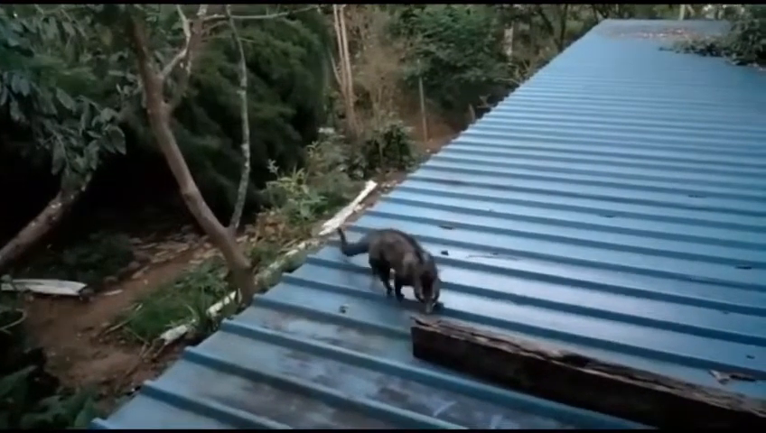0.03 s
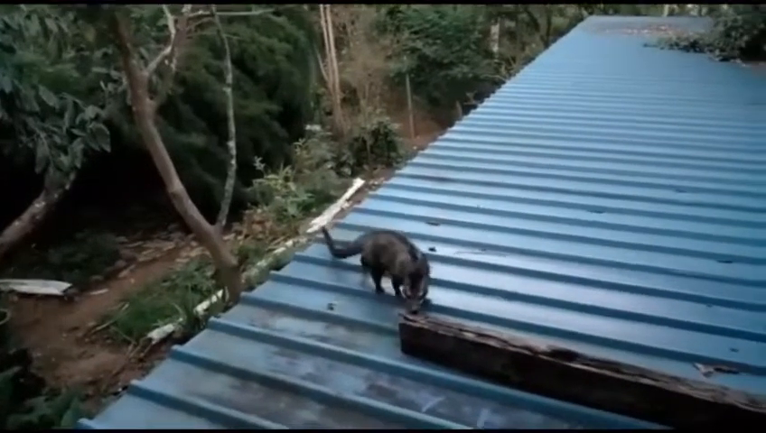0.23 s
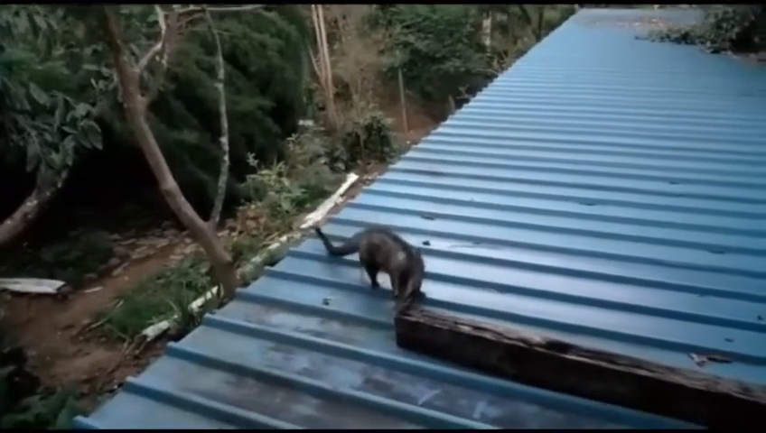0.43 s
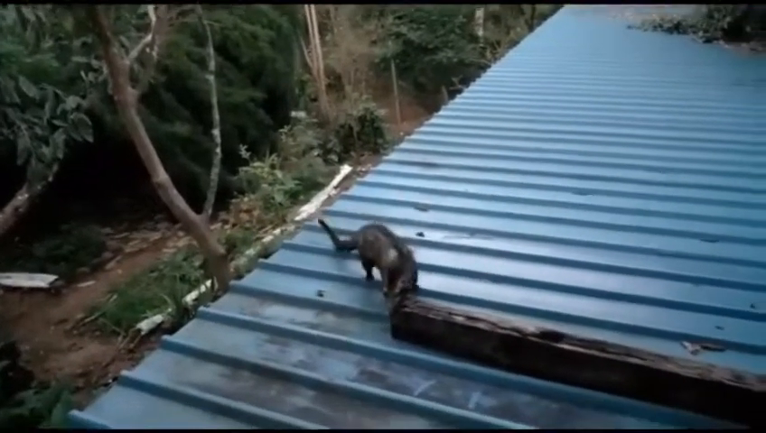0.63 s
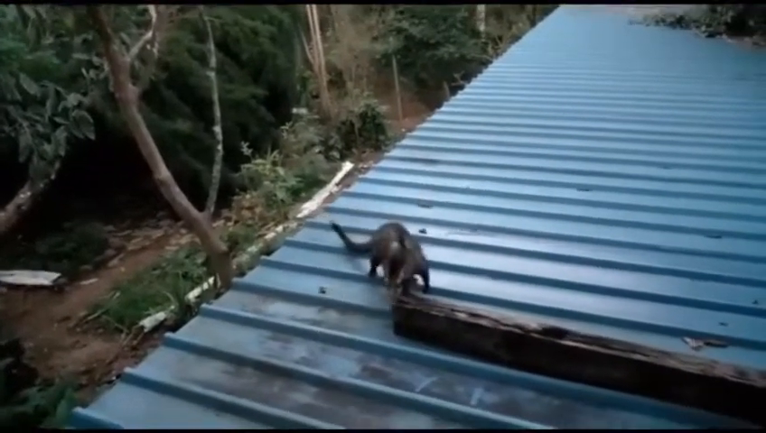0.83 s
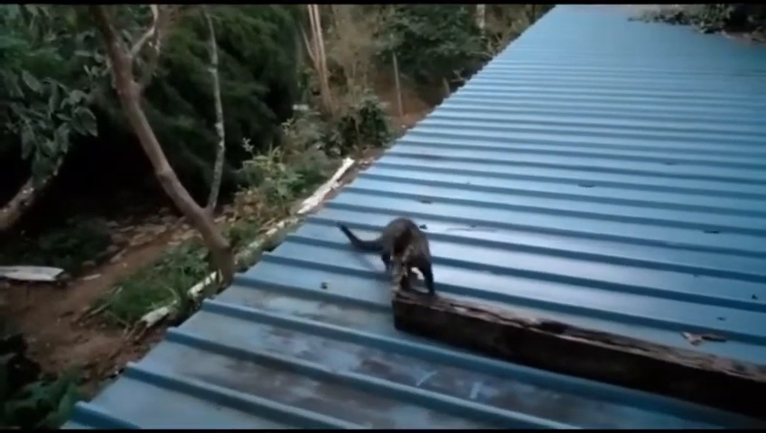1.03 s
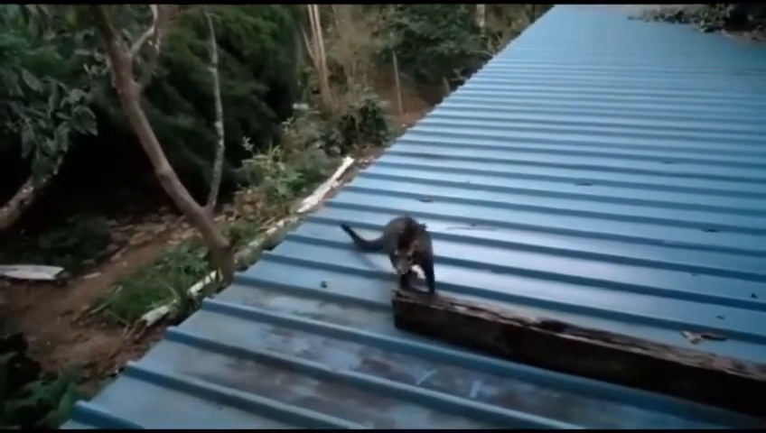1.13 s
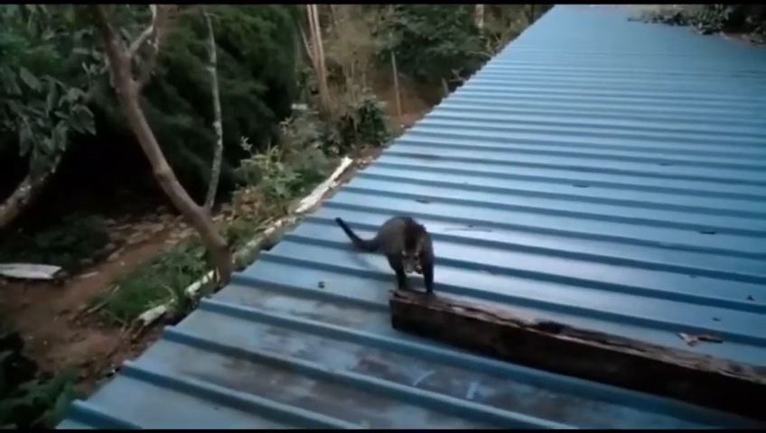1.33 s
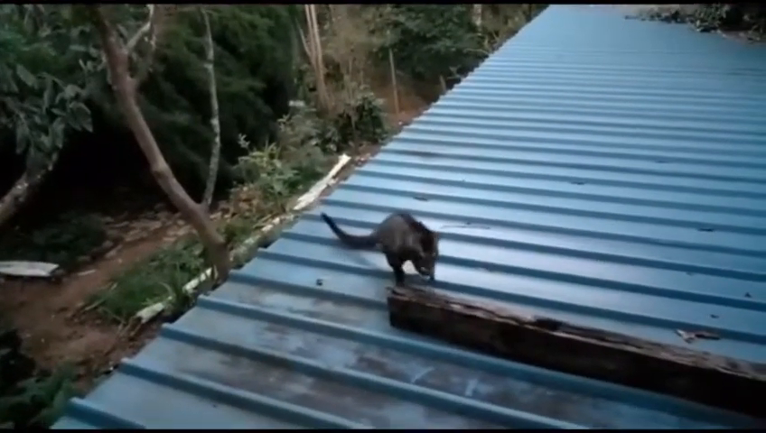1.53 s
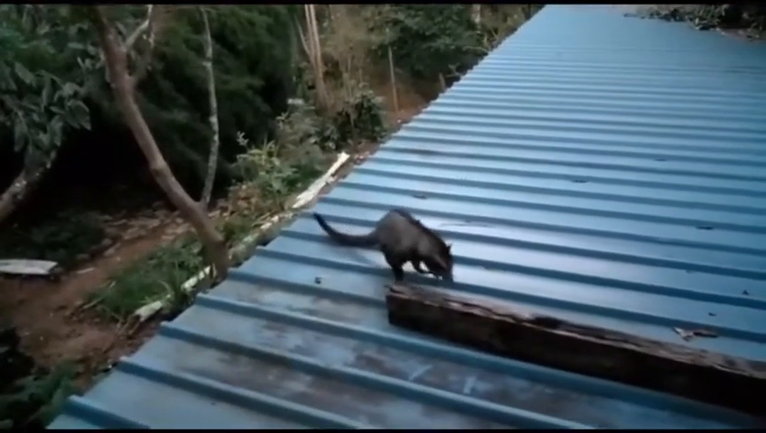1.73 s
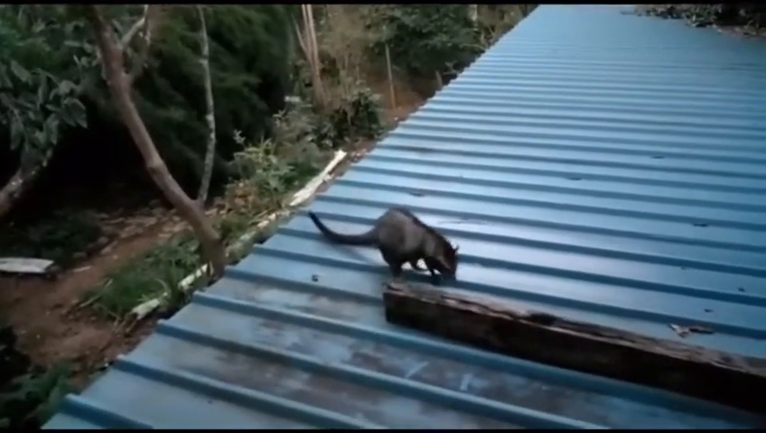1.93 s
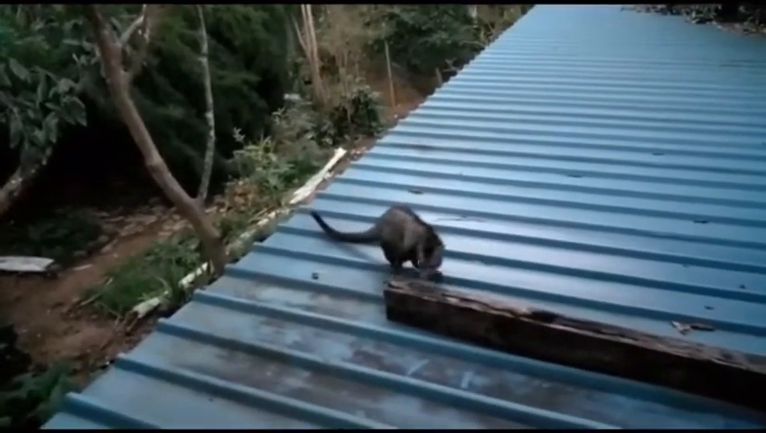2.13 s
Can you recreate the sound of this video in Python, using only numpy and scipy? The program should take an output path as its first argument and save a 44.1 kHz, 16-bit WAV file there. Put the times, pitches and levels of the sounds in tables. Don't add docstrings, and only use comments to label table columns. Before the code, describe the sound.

Outdoors near trees, a shrill animal cry arches and drops in steps, distant chirpy calls answer in the gap, then a second shaky scream comes as a very faint engine revs far off; slightly dull phone sound.

```python
import sys
import numpy as np
from scipy import signal
from scipy.fft import rfft, irfft
from scipy.io import wavfile
from scipy.ndimage import uniform_filter1d, minimum_filter1d

SR = 44100
rng = np.random.default_rng(int(sys.argv[2]) if len(sys.argv) > 2 else 0)


def boost(x):
    u = np.asarray(x, float) / 20
    return 10 ** u


def dump_mix(stems):
    frames = np.atleast_2d(stems).T
    limited = np.clip(frames, -1, 1)
    pcm = np.round(limited * 32767).astype(np.int16)
    wavfile.write(sys.argv[1], SR, pcm)


N = 95961


def walk(rate_hz):
    size = max(int(SR / rate_hz), 1)
    wander = uniform_filter1d(uniform_filter1d(rng.standard_normal(N), size), size)
    return wander / wander.std()


def colour(x, outline):
    hz, gain_db = np.array(outline, float).T
    bin_hz = np.maximum(np.fft.rfftfreq(N, 1 / SR), 1)
    return irfft(rfft(x) * boost(np.interp(np.log(bin_hz), np.log(hz), gain_db)), N)


def cries(t):
    # time in seconds, pitch in Hz.
    wail_pitch = [
        (0, 2930),
        (.075, 2990),
        (.115, 3110),
        (.15, 3020),
        (.2, 2950),
        (.228, 2710),
        (.262, 2610),
        (.293, 2580),
        (.308, 2390),
                  (.356, 2240),
        (.372, 1820),
        (.425, 1730),
        (.47, 1390),
        (.495, 1330),
        (.53, 1040),
        (.56, 900),
    ]
    # time in seconds, pitch in Hz.
    waver_pitch = [
        (1.79, 1930),
        (1.878, 2830),
        (1.91, 2540),
        (1.95, 2800),
        (1.98, 2620),
        (2.052, 2640),
        (2.085, 2200),
        (2.13, 2480),
        (2.175, 1700),
    ]
    # time in seconds, effort in dB, hoarseness 0-1.
    wail_effort = [
        (0, -30.5, 0.3),
        (.12, -20, 0.29),
        (.2, -20.5, 0.14),
        (0.269, -24.5, 0.1),
        (0.357, -22, 0.25),
        (0.412, -25.5, 0.01),
        (.47, -27, 0.51),
        (0.533, -26, 0.49),
        (.565, -52, 0.9),
    ]
    # time in seconds, effort in dB, hoarseness 0-1.
    push_effort = [
        (1.775, -92, 0.65),
        (1.788, -44, 0.9),
        (1.798, -22.5, 0.63),
        (1.835, -22, 0.29),
        (1.9, -20, 0.35),
        (1.971, -21.5, 0.32),
        (2.042, -22.5, 0.11),
        (2.091, -23, 0.39),
        (2.175, -26.5, 0.2),
    ]
    # frequency in Hz, gain in dB.
    throat_colour = [(1900, -27), (2800, -18.5), (3600, -8), (4500, 0.5), (5600, -6), (7200, -24.5),
                     (10500, -13), (13000, -20)]

    pitch = np.array(wail_pitch + waver_pitch)
    effort = np.array(wail_effort + push_effort)
    glide_s = .012
    hz = uniform_filter1d(np.interp(t, *pitch.T), int(glide_s * SR))
    hoarse = np.clip(np.interp(t, effort[:, 0], effort[:, 2]), 0, 1)
    jitter = .045 * hoarse * walk(350)
    wobble = .007 * walk(41.8)
    phase = 2 * np.pi * np.cumsum(hz * (1 + jitter + wobble)) / SR

    opens_s, opening_s, shut_db, veil_db = 1.8, .07, -14, -21
    shut = (t > 1) * np.clip(1 - (t - opens_s) / opening_s, 0, 1)
    muffle_db = veil_db * hoarse + shut_db * shut
    stack = 0
    for k in range(1, 15):
        fade_db = -1.5 * max(k - 4, 0)
        treble = np.clip(k * hz / 2500 - 2, 0, 1)
        gain = boost(fade_db + 3 * walk(60) + muffle_db * treble)
        stack = stack + gain * np.sin(k * phase) * (k * hz < .4 * SR)

    halves = sum(np.sin((k + .5) * phase) for k in range(1, 4))
    shimmer_db = 7 * hoarse * walk(196)
    stack = (stack + boost(-8) * hoarse ** 2 * halves) * boost(shimmer_db)
    breath_filter = signal.butter(1, 6500, fs=SR)
    breath = boost(1) * hoarse * signal.lfilter(*breath_filter, rng.standard_normal(N))
    return colour((stack + breath) * boost(np.interp(t, effort[:, 0], effort[:, 1])), throat_colour)


def scatter(x, t60_s, band_hz):
    t = np.arange(SR) / SR
    build_up = np.minimum(t / 0.0051, 1)
    tail = rng.standard_normal(SR) * boost(-60 * t / t60_s) * build_up
    tail = tail / np.sqrt(np.sum(tail ** 2))
    tail = signal.sosfilt(signal.butter(1, band_hz, "band", fs=SR, output="sos"), tail)
    return signal.fftconvolve(x, tail)[:N]


def answers(t):
    # start in seconds, length in seconds, start pitch in Hz, end pitch in Hz, level in dB.
    far_calls = [
        (.66, .13, 3300, 4200, -37),
        (.66, .07, 5200, 5300, -48),
        (.85, .07, 5450, 5300, -47),
        (1.13, .14, 4050, 4200, -43),
        (1.52, .11, 4100, 4200, -43),
        (.12, .08, 1350, 1320, -53),
        (.55, .07, 1370, 1330, -51),
    ]
    rise_part, jitter = .4, .06
    calls, shake = 0, walk(300)
    for start_s, length_s, from_hz, to_hz, call_db in far_calls:
        u = np.clip((t - start_s) / length_s, 0, 1)
        hz = from_hz + (to_hz - from_hz) * np.minimum(u / rise_part, 1)
        phase = 2 * np.pi * np.cumsum(hz * (1 + jitter * shake)) / SR
        swell = np.sqrt(np.sin(np.pi * u) + 1e-9)
        calls = calls + boost(call_db) * swell * np.sin(phase)
    return boost(0.8) * scatter(calls, 0.17, (500, 9000))


def engine(t):
    # time in seconds, firing rate in Hz, level in dB.
    revs = [
        (1.35, 108, -72),
        (1.45, 113, -64),
        (1.58, 134, -57),
        (1.7, 147, -56),
        (1.85, 148, -58),
        (1.95, 145, -66),
        (2.17, 150, -60),
    ]
    orders_db = [0, -5, -9, -14]
    time_s, firing_hz, rev_db = np.array(revs).T
    hz = np.interp(t, time_s, firing_hz) * (1 + 0.0088 * walk(20.42))
    phase = 2 * np.pi * np.cumsum(hz) / SR
    tone = sum(boost(db + 1.5 * walk(10)) * np.sin((k + 1) * phase) for k, db in enumerate(orders_db))
    return np.sqrt(2) * tone * boost(np.interp(t, time_s, rev_db, left=-90))


def air(t):
    # frequency in Hz, density in dB per Hz.
    air_colour = [(25, -26), (90, -15), (350, -5), (900, -8.5), (4300, -8.5), (5600, -23.5), (7400, -45),
                  (10500, -37), (12600, -43)]
    # time in seconds, gain in dB.
    breeze = [
        (0, 2),
        (.5, 4),
        (.9, 0.5),
        (1.7, 1),
        (2.17, 5),
    ]
    hz, hiss = np.fft.rfftfreq(N, 1 / SR), 0
    swell_db = .4 * walk(4.5)
    for centre_hz in 30 * 2. ** np.arange(10):
        band = np.clip(1 - np.abs(np.log2((hz + 1) / centre_hz)), 0, 1) ** .5
        noise = irfft(rfft(rng.standard_normal(N)) * band, N)
        hiss = hiss + noise * boost(swell_db + .8 * walk(21))
    hiss = colour(hiss, air_colour)
    hiss = hiss * boost(-48) / np.sqrt(np.mean(hiss ** 2))
    return hiss * boost(np.interp(t, *np.array(breeze).T))


def scene():
    t = np.arange(N) / SR
    voice = cries(t)
    roof = boost(3) * scatter(voice, 0.24, (3290, 9720))
    trees = boost(-15.5) * scatter(voice, 1, (3330, 5200))
    end_s = 2.176
    fade_out = np.clip((end_s - t) / 0.0015, 0, 1)
    return ((voice + roof + trees + answers(t) + engine(t) + air(t)) * fade_out)[None]


def masking(x):
    from_hz, reach_hz, mask_db = 5600, 2600, -30
    top_hz, top_db = 11700, -36
    hz, _, z = signal.stft(x, SR, nperseg=1024)
    band = uniform_filter1d(uniform_filter1d(np.abs(z) ** 2, size=9, axis=0), size=3, axis=1)
    reach = int(reach_hz / hz[1])
    loudest = -minimum_filter1d(-band, reach, axis=0, origin=(reach - 1) // 2)
    keep = (band > loudest * boost(2 * mask_db)) | (hz[:, None] < from_hz)
    keep &= (hz[:, None] < top_hz) | (band > band.max(axis=0) * boost(2 * top_db))
    return signal.istft(z * keep, SR, nperseg=1024)[1][:N]


def band_limit(x):
    return signal.sosfilt(signal.butter(12, 12690, fs=SR, output="sos"), x)


def record(dry):
    mix = masking(dry[0])[None]
    return band_limit(mix)


dry = scene()
out = record(dry)
dump_mix(out)
```